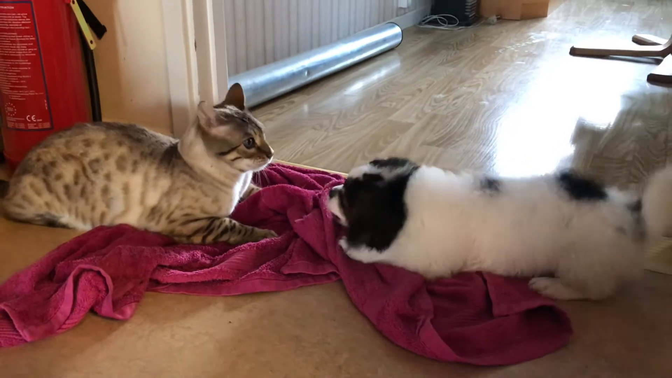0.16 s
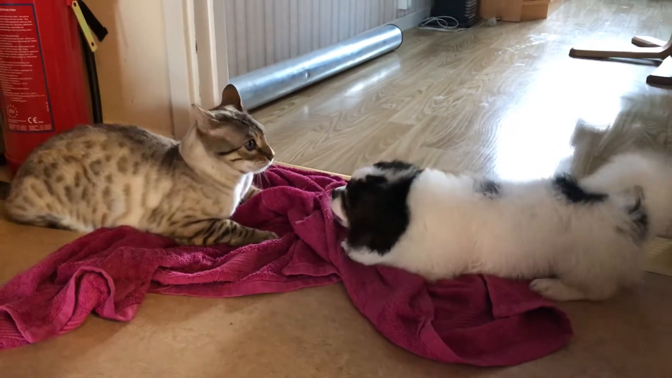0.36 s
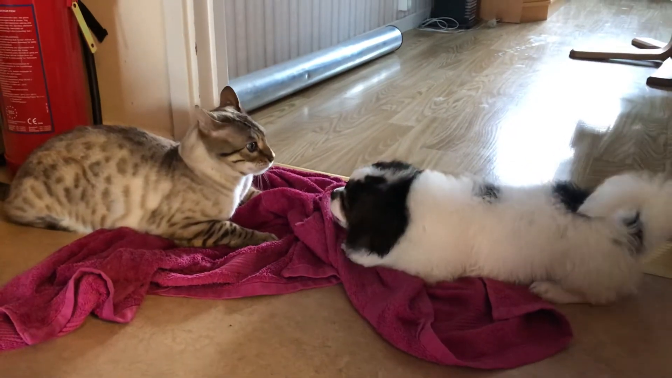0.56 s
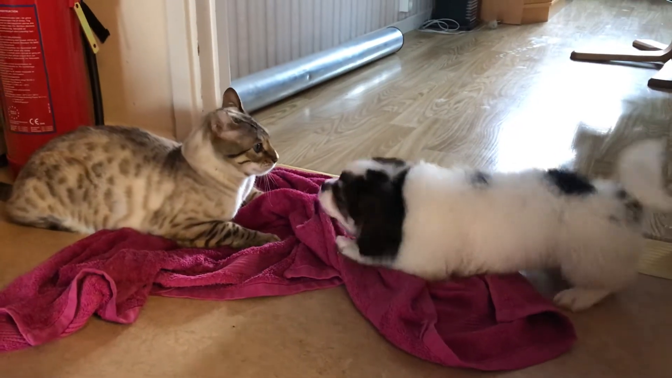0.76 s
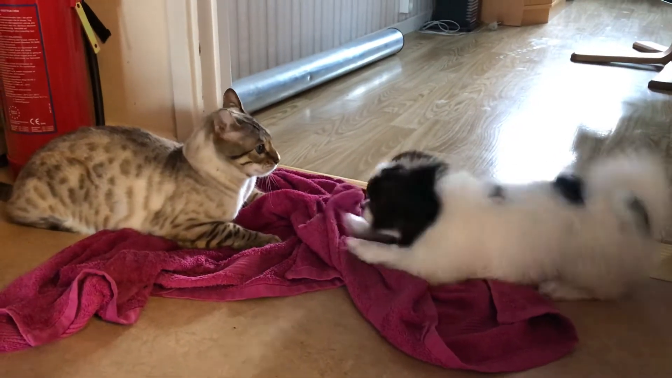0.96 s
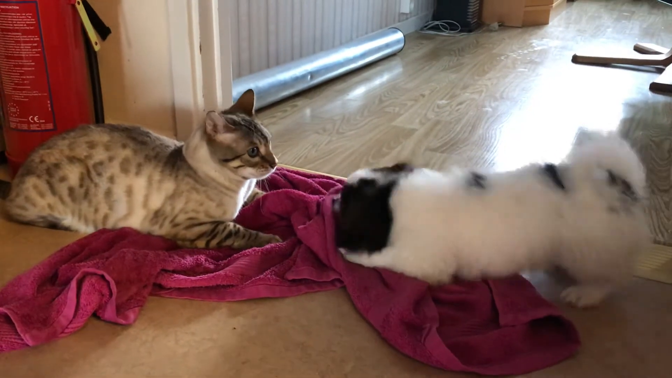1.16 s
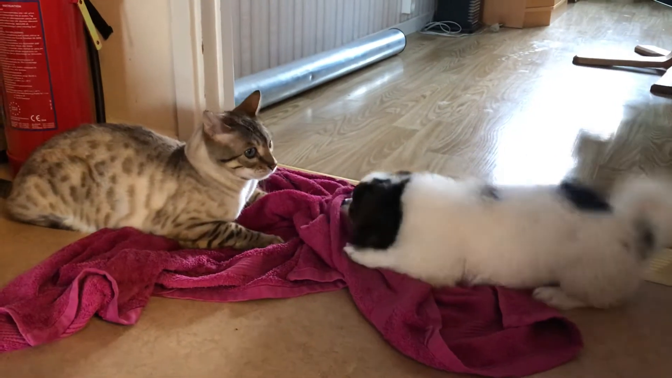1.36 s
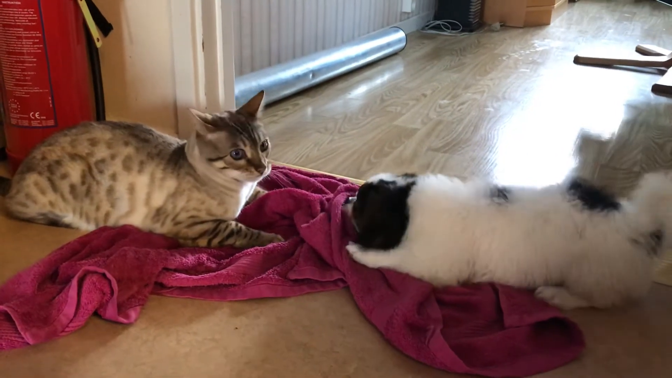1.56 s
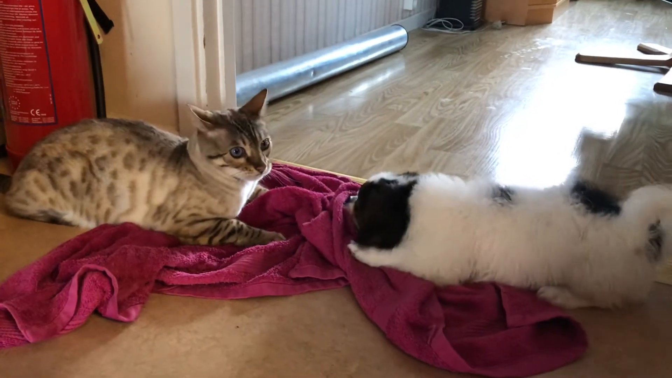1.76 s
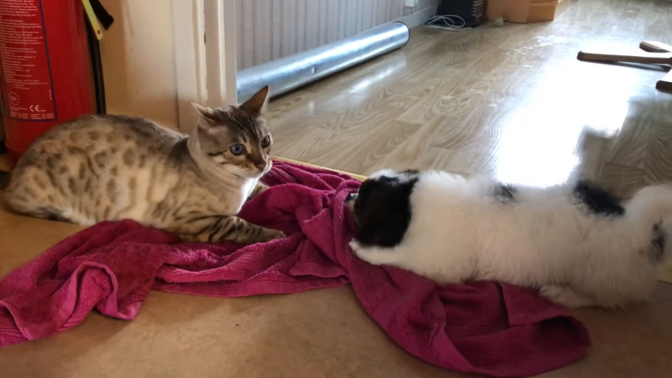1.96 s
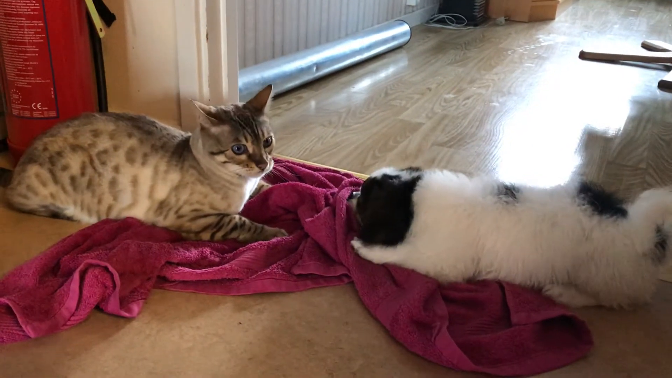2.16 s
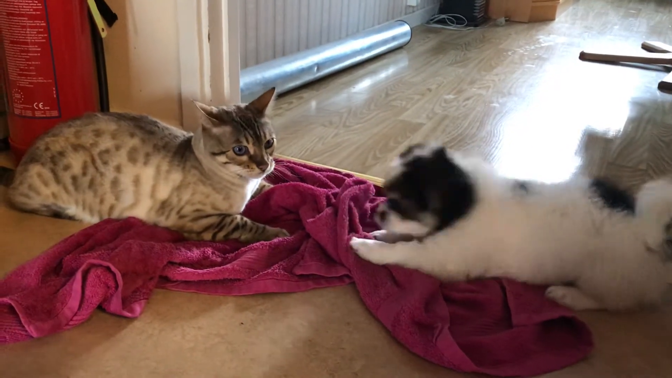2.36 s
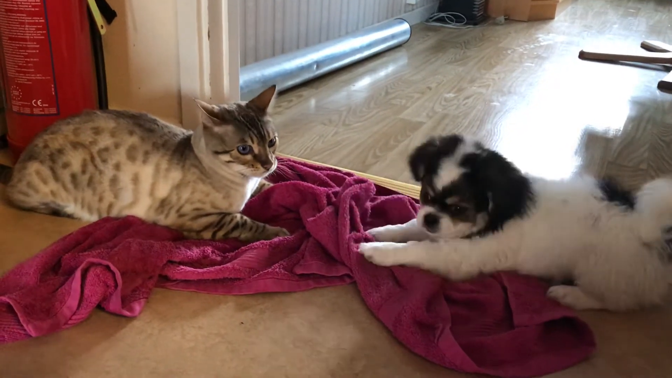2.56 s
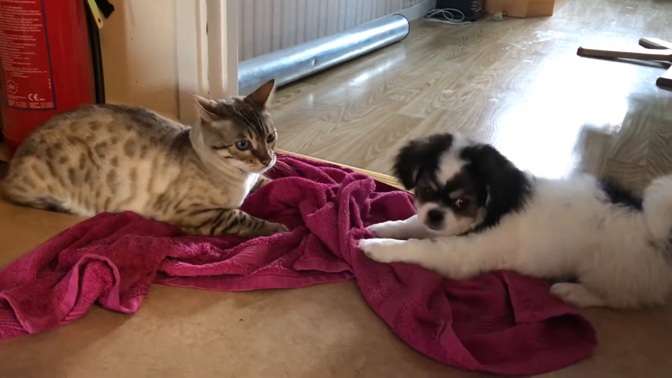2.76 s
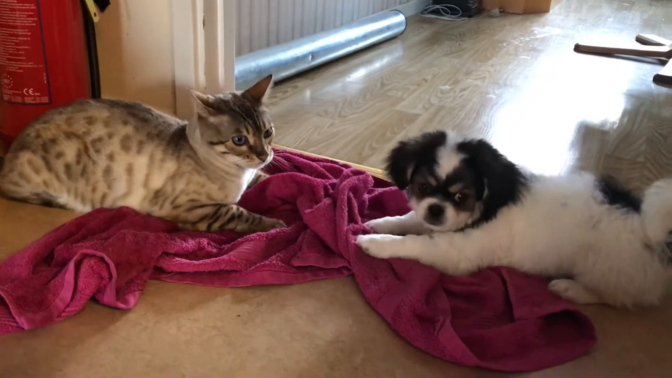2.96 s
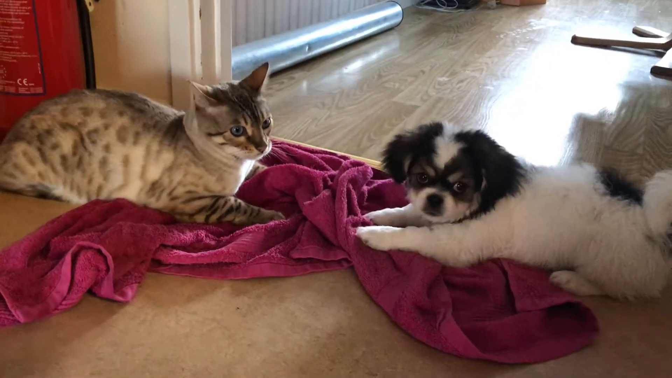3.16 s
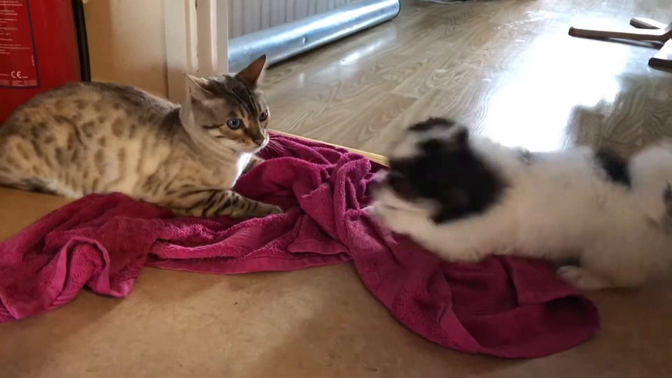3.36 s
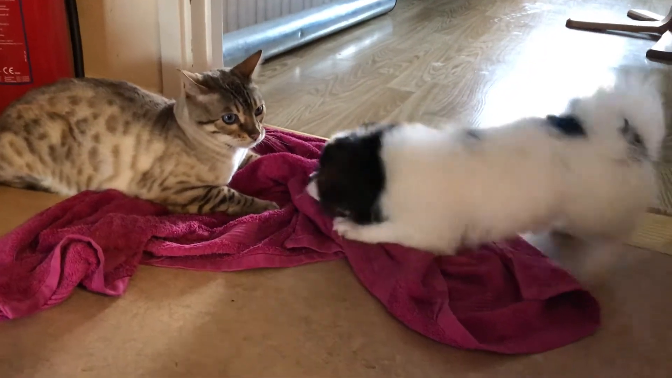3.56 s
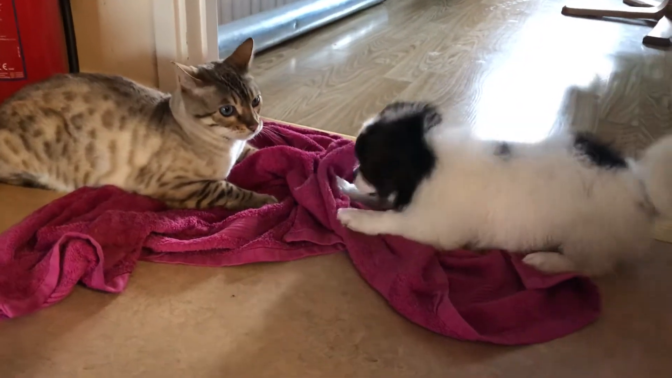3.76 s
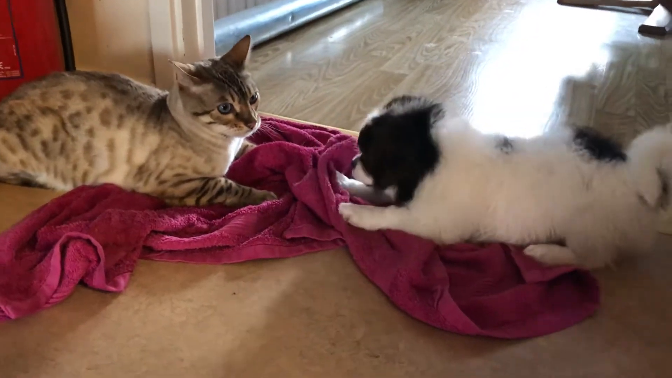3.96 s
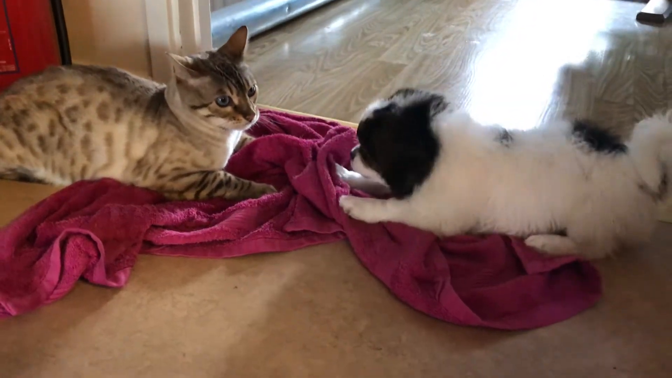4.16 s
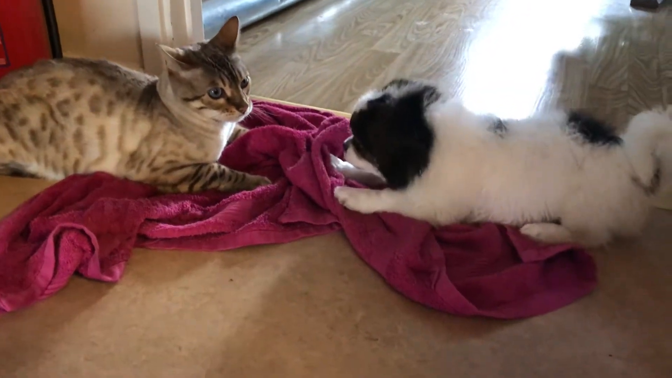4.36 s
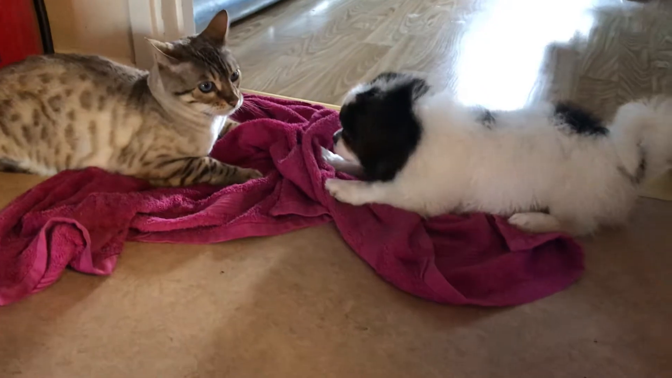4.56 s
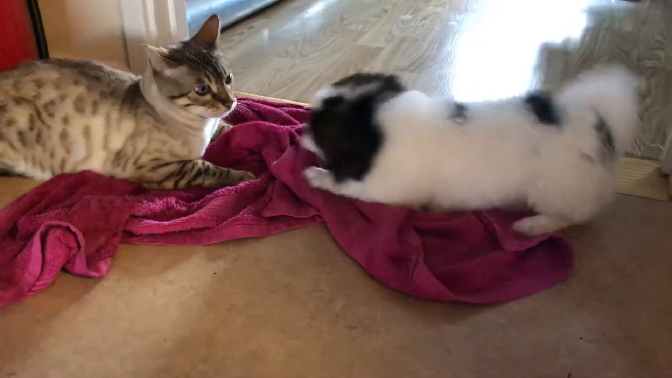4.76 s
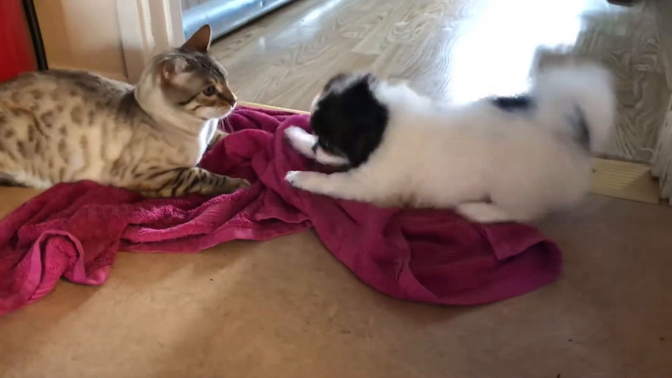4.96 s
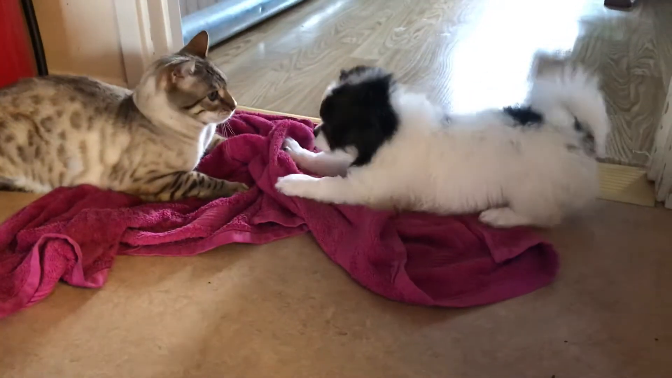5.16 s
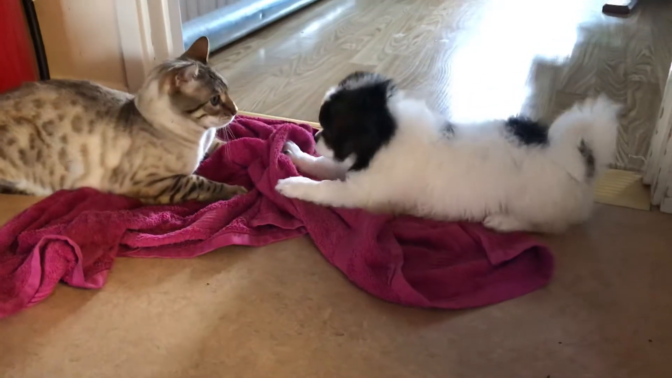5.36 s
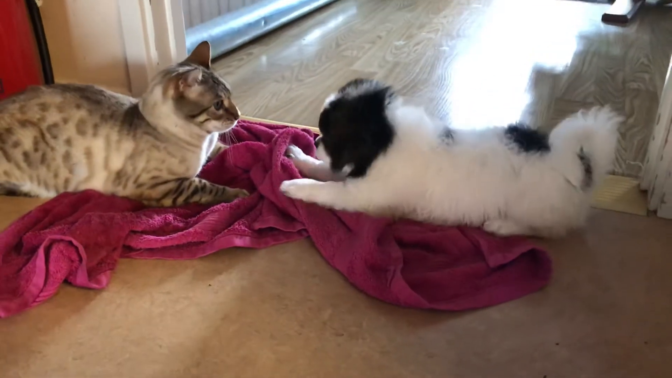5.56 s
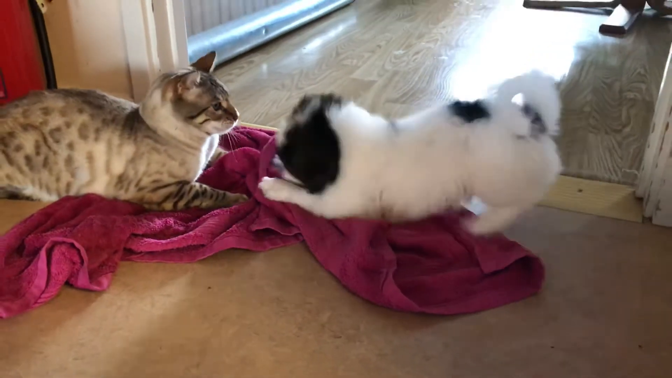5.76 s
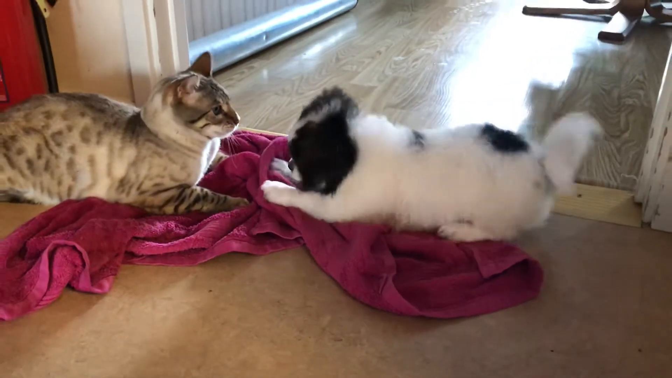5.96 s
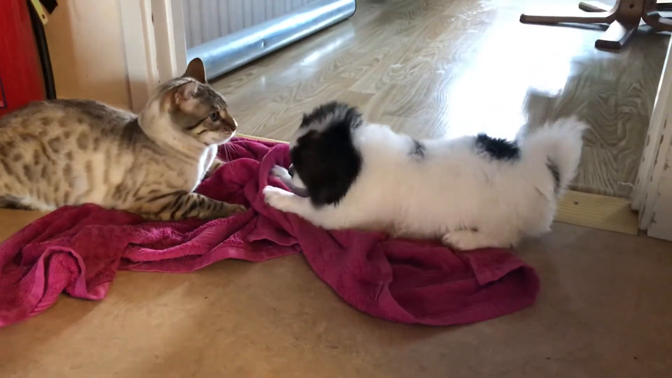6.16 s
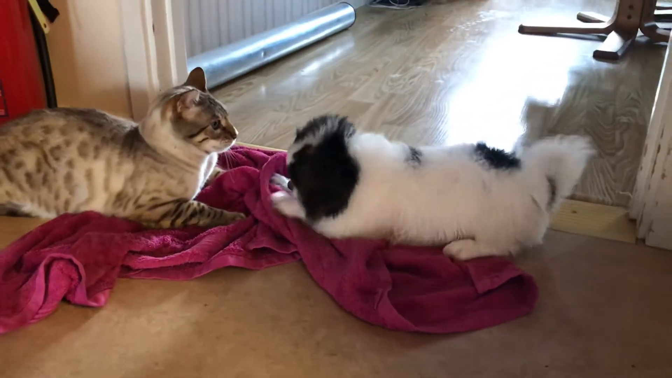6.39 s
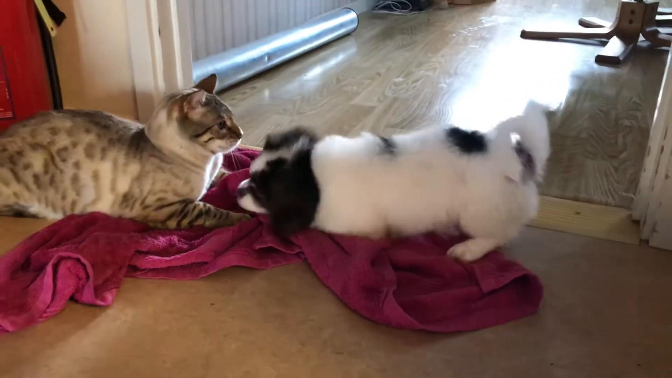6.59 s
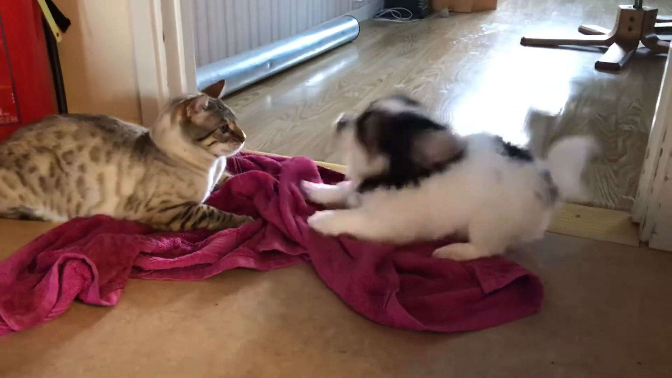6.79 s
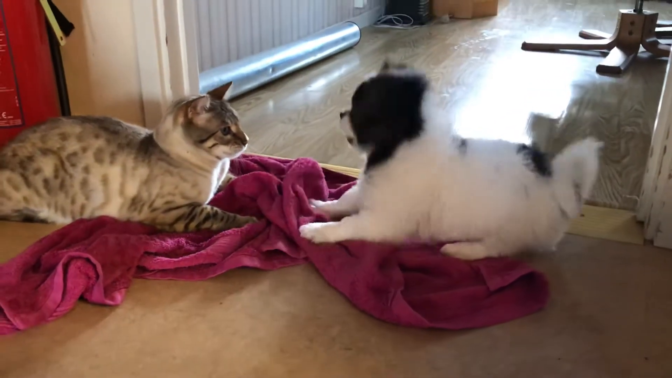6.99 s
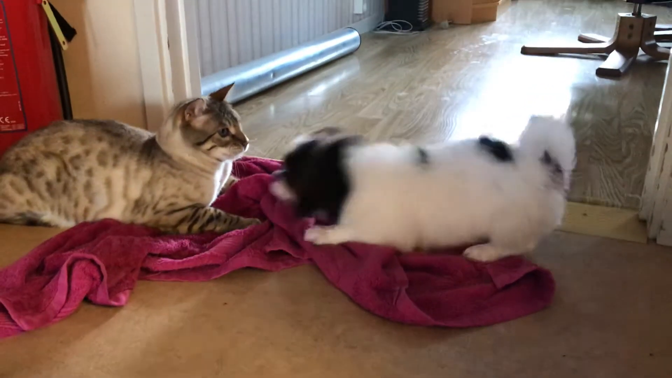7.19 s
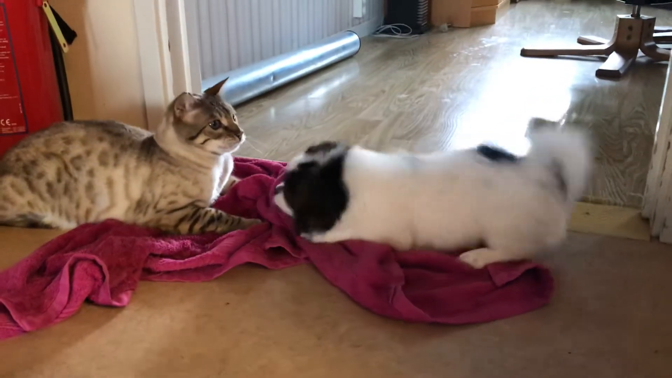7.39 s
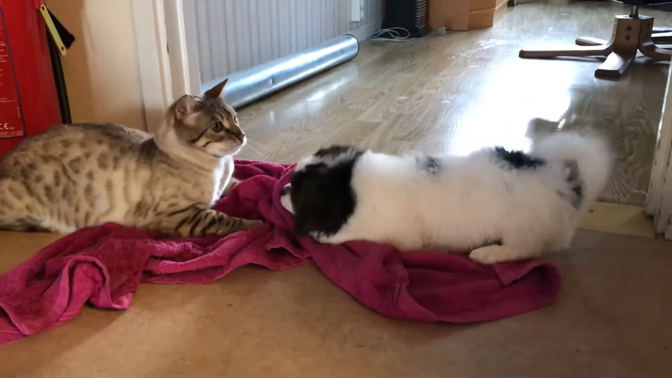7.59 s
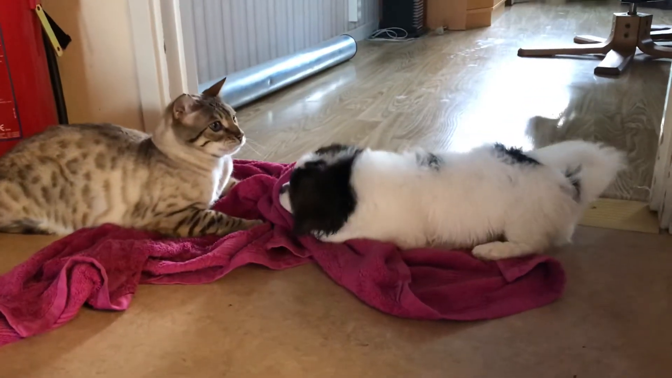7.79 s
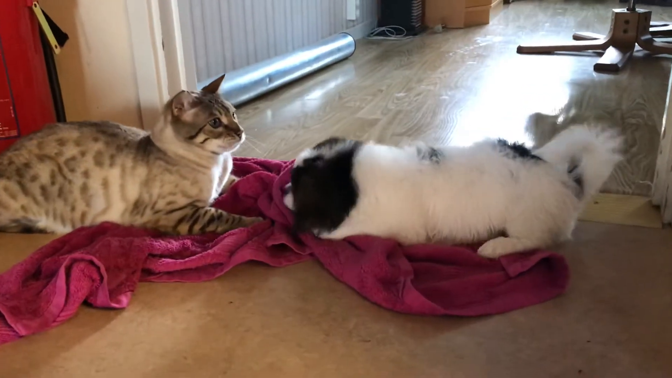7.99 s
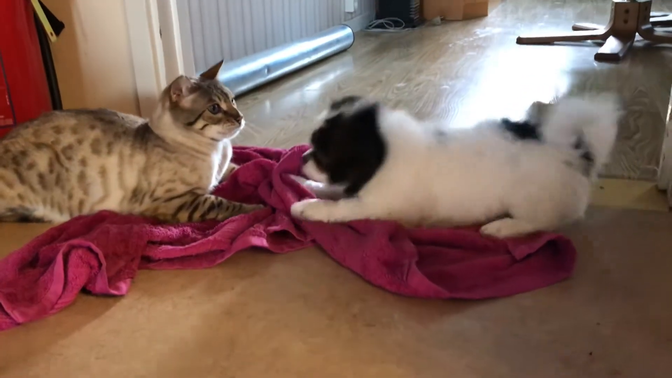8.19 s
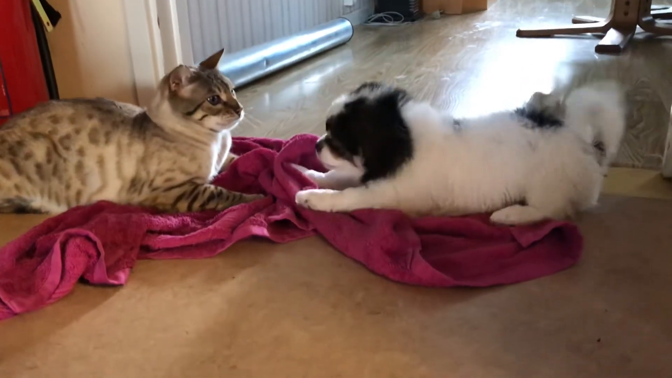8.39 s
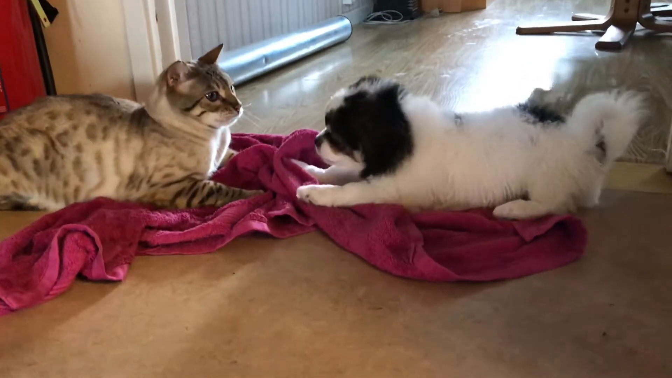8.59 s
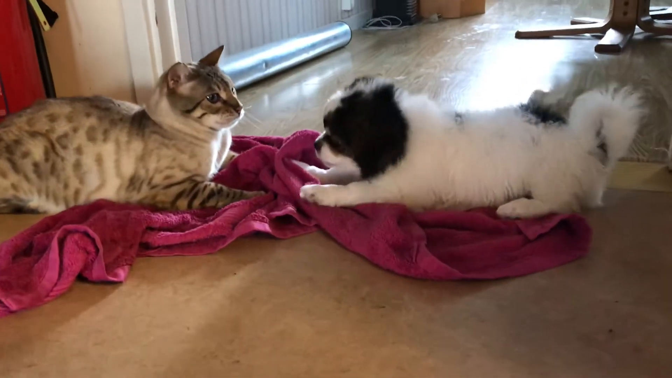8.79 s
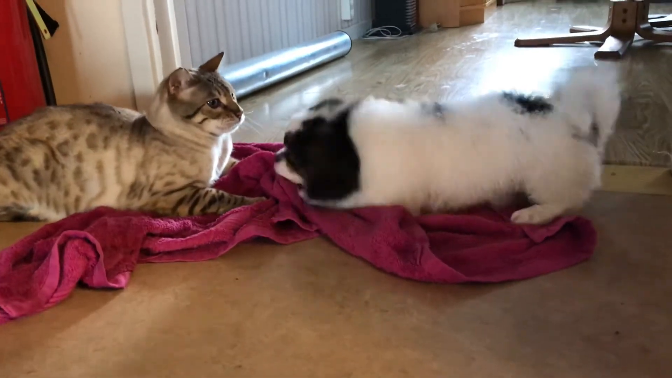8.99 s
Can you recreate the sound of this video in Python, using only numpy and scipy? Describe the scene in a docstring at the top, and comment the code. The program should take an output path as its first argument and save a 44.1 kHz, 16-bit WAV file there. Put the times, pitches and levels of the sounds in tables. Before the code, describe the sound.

A puppy yaps sharply indoors, with one low growl midway, amid clicking teeth and claws, paw thumps and a faint hum.

```python
"""A puppy yaps at a cat in a small hard-floored room, over the faint hum of an appliance.
A towel rustles under it as it starts with three yaps, grunting just before the third. A fourth follows
a pause; halfway through comes one low growl, then five more yaps. Each yap is breath shaking the vocal
folds: it starts hoarse, in most cases breaks into a clear note and a squeal, and falls back into a rasp.
All along, teeth and claws click and paws thump, and the walls echo the puppy's sounds."""
import sys
import numpy as np
from scipy import signal
from scipy.fft import rfft, irfft
from scipy.io import wavfile
from scipy.ndimage import uniform_filter1d, minimum_filter1d

SR = 44100
rng = np.random.default_rng(int(sys.argv[2]) if len(sys.argv) > 2 else 0)


def wav_out(sig):
    """Save sig, one row per channel (or a flat mono array), as 16-bit PCM at SR to the path in sys.argv[1]."""
    wavfile.write(sys.argv[1], SR, np.round(np.clip(np.atleast_2d(sig).T, -1, 1) * 32767).astype(np.int16))


N = 398663

# A "colour" says how strong a sound is from low to high. Each lists (frequency [Hz], level [dB]).
RUMBLE_COLOUR = [(15, -55.5), (25, -33), (70, -13.5), (108, -3), (145, -15.5), (175, -11), (242, -18),
                 (277, -5), (301, -13.5), (451, -20), (624, -20), (988, -21.5), (1330, -25), (1940, -30),
                 (16000, -57)]
HISS_COLOUR = [(300, -8), (1500, 8.5), (5000, 2), (7500, -0.5), (10000, -3), (15000, -4.5)]
ECHO_COLOUR = [(100, -9), (500, 4), (1000, -4), (2000, 2.5), (3200, 3.5), (6000, -2.5), (14000, -3)]
PAW_COLOUR = [(20, -43.5), (40, -17.5), (65, -4), (110, -1), (180, -4), (300, -17.5), (600, -29),
              (2000, -35.5), (6000, -76)]
CLICK_COLOUR = [(300, -20.5), (1500, 1.5), (2500, -3), (4200, -2), (6000, 1), (8000, 3), (11000, 2),
                (15000, -3)]
GROWL_COLOUR = [(60, -25.5), (130, -16.5), (230, 6), (350, 2), (560, -4), (1000, -7.5), (1700, -10.5),
                (2500, -24), (2900, -19), (3600, -31), (5500, -34.5), (15000, -46)]
BREATH_COLOUR = [(4000, -21.5), (5500, -1.5), (6600, -21), (8300, -2), (9700, -6.5), (11000, -3.5),
                 (12300, -0.5), (14000, -5), (16000, -13.5)]
# how long the room rings: (frequency [Hz], time to fade by 60 dB [s])
ECHO_TIMES = [(150, 0.46), (500, 0.35), (1000, 0.4959), (2000, 0.64), (3500, .5), (8000, 0.5),
              (15000, 0.84)]
# the appliance's tones: (frequency [Hz], level [dB])
HUM_TONES = [(102.3, -76.5), (274.5, -68.5), (372, -75.5), (613.7, -80.5), (635.2, -75.5)]
# the towel shifting: (start [s], length [s], level [dB])
RUSTLES = [(-.3, 0.47, -45), (.6, 1.15, -60.5), (3.5, 0.84, -66), (4.1, 0.73, -63.5), (5.55, 0.43, -68.5),
           (6.3, 0.82, -78.5), (7.25, 1.26, -64), (8.85, 0.31, -62)]
# towel rubs and soft snuffles: (start [s], length [s], level [dB], centre [Hz], width [octaves])
RUBS = [(0.144, 0.078, -59.5, 8900, 1.3), (1.933, 0.021, -53, 1000, 0.39), (2.343, 0.2, -66.5, 1200, 1.54),
        (2.353, 0.17, -74, 5500, 0.36), (3.393, 0.028, -65, 3800, 0.32), (3.454, 0.041, -53, 3970, 0.52),
        (3.45, 0.052, -58, 1590, 0.37), (4.121, 0.055, -64, 1230, 0.78), (4.778, 0.11, -61.5, 2480, 1.77),
        (5.076, 0.11, -63, 5160, 0.19), (6.338, 0.048, -75, 4970, 0.87), (7.042, 0.015, -61.5, 2010, 0.57),
        (7.125, 0.034, -64, 2400, 0.24), (7.204, .04, -59.5, 7880, .8)]
# paws landing: (time [s], peak level [dB])
PAW_THUMPS = [(0.131, -40), (0.186, -53.5), (1.395, -39.5), (3.513, -37.5), (3.724, -39.5), (4.287, -46.5),
              (5.023, -32), (5.9, -34), (6.518, -52), (6.769, -38), (6.799, -43), (7.187, -42.5),
              (7.443, -42), (8.078, -54)]
# teeth and claws: (time [s], level [dB])
CLICKS = [(0.135, -29), (0.7925, -30.5), (0.989, -39.5), (1.3933, -23), (2.9327, -52.5), (3.3764, -45),
          (3.521, -15.5), (3.734, -30.5), (4.6716, -49), (4.945, -42), (5.022, -22), (5.904, -24.5),
          (6.7726, -27), (7.0191, -42.5), (7.438, -37.5), (8.0705, -38), (8.9034, -52)]
# the growl's pushes: (start [s], length [s], level [dB], first flap rate [Hz], mouth resonance [Hz])
GROWL_PUSHES = [(4.897, 0.083, -30, 173, 785), (4.971, 0.088, -31.5, 197, 730),
                (5.063, 0.039, -32, 120, 984), (5.085, .085, -31, 138, 1178), (5.161, 0.1, -43.5, 88, 776),
                (5.221, 0.1, -44.5, 75, 740), (5.313, 0.071, -47.5, 55, 732)]
# the yaps: (start [s], rise [s], hold [s], fall [s], level [dB], starting effort [dB],
# top hoarse pitch [Hz], roughness [0-1], brightness [dB], lag of the treble [s])
YAPS = [(-0.02, 0.021, 0.064, 0.051, -16, -7.5, 478.5, 0.83, -7.5, 0.024),
        (0.733, 0.025, 0.066, 0.072, -13.5, -10, 527, .3, -5, 0.02),
        (1.238, 0.017, .086, 0.066, -16.5, -11.5, 470.3, .6, -4.5, 0.014),
        (3.536, 0.029, 0.064, .05, -11, -10.5, 476.5, 0.4, -6, 0.007),
        (5.644, 0.044, 0.059, 0.094, -13, -28, 605, 0.6, -10, 0.011),
        (6.512, 0.039, 0.041, 0.054, -17, -21.5, 446.4, 0.52, -11, 0.0023),
        (7.223, .043, .055, .05, -12, -23.5, 585.2, .35, -9.5, 0.0012),
        (8.08, .04, .04, .052, -14.5, -21.5, 465.6, 0.56, -10.5, .004),
        (8.941, .031, 0.061, 0.057, -11.5, -14.5, 593, 0.46, -6, 0.0087)]
# mouth shape for each yap; a resonance is a frequency at which the air inside rings:
# (resonances 1 to 4 [Hz], levels of resonances 2 to 4 [dB], top band [dB], nose [dB], breath [dB])
MOUTHS = [(983, 1700, 2380, 3450, -5, 1, -7, -12, -12, -23),
          (1040, 1650, 2300, 3150, 4.5, -18, -6, -16.5, -13, -23),
          (928, 1427, 2350, 2300, 6.5, -5, -9, -47.5, -11, -42),
          (947, 1600, 2150, 2900, 8, 11.5, 4.5, -8.5, -16, -29.5),
          (1059, 2460, 1800, 3170, -3.5, 3, 3, -15.5, -13, -18.5),
          (883, 1600, 2470, 3600, -29, 9.5, 1, -9.5, -6, -22),
          (1035, 1040, 2270, 4050, -4, 0, -14.5, -16, -13, -22.5),
          (913, 1540, 2640, 3850, -3, 7.5, -4, -18, -10, -22.5),
          (1047, 1810, 2640, 3070, 19, 20, 10.5, -31, -14.5, -19.5)]
# where the voice breaks: (start [s], note length [s], note pitch [Hz], note boost [dB],
# squeal length [s], squeal pitch [Hz], squeal boost [dB], squeal roughness [0-1], extra brightness [dB])
VOICE_BREAKS = [(0.765, 0.047, 761.6, -4.5, 0.027, 1023, 9, 0.39, 2.5),
                (1.262, .034, 760.8, -4, .024, 893.7, 5.5, 0.3, 1),
                (3.568, 0.032, 798.4, -1, 0.04, 957.5, 0, 0.64, -1),
                (5.72, .026, 775.5, -5.5, .042, 818, 0.5, 0.31, 4.5),
                (7.281, .021, 804.6, -6.5, .031, 1020, 4.5, 0.43, 0.5),
                (8.983, 0.031, 793, -1, .045, 859, 0.5, 0.24, -0.5)]
# whistling gaps between the teeth: (frequency [Hz], width [Hz], level [dB])
TOOTH_GAPS = [(8500, 300, -5), (10950, 400, -6), (13600, 500, -5.5)]

START_HZ, END_HZ, END_ROUGHNESS = 279.7, 270.7, 0.59  # a yap's voice at its two weak ends
EFFORT_FADE_DB, NOSE_FADE_DB = -23.5, -6  # drops as a yap ends
TREBLE_START_DB, TREBLE_FADE_DB = -5, -14.5  # extra dullness as a yap starts and ends
BREAK_S, NOTE_ROUGHNESS, NOTE_RISE_HZ_PER_S, SQUEAL_SAG_HZ_PER_S = .008, .07, 1500, 1600


def gain_of(db):
    """Turns decibels into a number to multiply by."""
    return 10 ** (np.asarray(db) / 20)


def evened(x):
    """Scales a sound to an average strength (rms) of 1."""
    return x / np.sqrt(np.mean(x ** 2) + 1e-20)


def steadied(x, size=400):
    """Keeps a sound's strength near 1 from moment to moment."""
    power = uniform_filter1d(uniform_filter1d(x ** 2, size), size)
    return x / np.sqrt(abs(power) + 1e-20)


def look_up(points, hz):
    """Reads between the rows of a table by frequency, on a log scale."""
    f, value = np.transpose(points)
    return np.interp(np.log(hz + 1), np.log(f + 1), value)


def ramp(t, start, length):
    """Rises from 0 to 1 over length seconds."""
    return np.clip((t - start) / length, 0, 1)


def add(mix, start, sound):
    """Adds a sound to the mix at a time in seconds."""
    at = round(start * SR)
    sound = sound[max(0, -at):]
    part = mix[max(0, at):][:len(sound)]
    part += sound[:len(part)]


def white(count):
    """Up to a second of plain noise."""
    return rng.standard_normal(SR)[:count]


def coloured(x, colour):
    """Gives a sound a colour, at strength 1."""
    hz = np.fft.rfftfreq(len(x), 1 / SR)
    return evened(irfft(rfft(x) * gain_of(look_up(colour, hz)), len(x)))


def waver(noise, hz):
    """Smooths noise into a wobble, mostly slower than hz."""
    return evened(signal.sosfilt(signal.butter(2, hz, fs=SR, output="sos"), noise))


def band(x, low_hz, high_hz, order=3):
    """Keeps what lies between two frequencies."""
    return signal.sosfilt(signal.butter(order, [low_hz, high_hz], "band", fs=SR, output="sos"), x)


def resonate(x, hz, width_hz):
    """Makes a sound ring around one frequency, which may slide."""
    turn = np.exp(2j * np.pi * np.cumsum(hz * np.ones(len(x))) / SR)
    keep = np.exp(-np.pi * width_hz / SR)
    return 2 * (turn * signal.lfilter([1 - keep], [1, -keep], x / turn + 1e-18)).real


def background():
    """The room rumbles, an appliance hums, and a faint hiss swells as the towel shifts."""
    t = np.arange(N) / SR
    rumble = gain_of(-59.53) * coloured(rng.standard_normal(N), RUMBLE_COLOUR)
    hum = np.zeros(N)
    for hz, db in HUM_TONES:
        drift = 0.36 * waver(rng.standard_normal(N), hz=4.4)
        hum += gain_of(db) * evened(np.sin(2 * np.pi * hz * t + drift))
    swells = sum(gain_of(db) * np.sin(np.pi * ramp(t, start, length)) ** 2
                 for start, length, db in RUSTLES)
    hiss = (gain_of(-74.5) + swells) * coloured(rng.standard_normal(N), HISS_COLOUR)
    return rumble + hum + hiss


def room_echo(x, spacing=22):
    """Sound bounces off the walls at random moments; each frequency dies away at its own speed."""
    count = SR // spacing
    bounces = np.zeros(SR)
    bounces[np.arange(count) * spacing + rng.integers(0, spacing, count)] = rng.choice([-1., 1.], count)
    hz, t, spectrum = signal.stft(bounces, SR, nperseg=256)
    fade = gain_of(-60 * t / look_up(ECHO_TIMES, hz)[:, None])
    tail = signal.istft(spectrum * fade, SR, nperseg=256)[1]
    age = np.arange(len(tail)) / SR
    early_boost = 1 + 3.44 * np.exp(-age / 0.019)  # near walls and the floor answer first and loudest
    tail = coloured(tail, ECHO_COLOUR) * early_boost * ramp(age, 0, 0.0008) ** 2
    tail = tail[:3 * SR // 4]
    return signal.fftconvolve(x, tail / np.linalg.norm(tail))[:N]


def rub(length, centre_hz, octaves):
    """A rub on the towel or a snuffle: one grainy swell of noise."""
    count = round(length * SR)
    hz = np.fft.rfftfreq(count, 1 / SR) + 1
    grains = white(count) * gain_of(2.6 * waver(white(count), hz=197.3))
    noise = irfft(rfft(grains) / (1 + (np.log2(hz / centre_hz) / octaves) ** 4), count)
    return evened(noise * np.sin(np.pi * np.linspace(0, 1, count) ** 0.68))


def knock(colour, rise_s, decay_s, size=16384):
    """A blow that does not ring, such as a paw landing: a burst of noise with peak 1."""
    t = np.arange(size) / SR
    burst = coloured(white(size), colour) * (1 - np.exp(-t / rise_s)) * np.exp(-t / decay_s)
    return burst / abs(burst).max()


def click():
    """A tooth or claw strikes: a dry tick, then a short scrape."""
    tick = knock(CLICK_COLOUR, rise_s=.0003, decay_s=.0016)
    scrape = knock(CLICK_COLOUR, rise_s=0.0018, decay_s=.03)
    return tick + gain_of(-19.5) * scrape


def grunt(length=.1, first_hz=220, sag_hz_per_s=520):
    """A nearly pure falling hum, made with the mouth shut."""
    t = np.arange(0, length, 1 / SR)
    hz = (first_hz - sag_hz_per_s * t) * (1 + 0.027 * waver(white(len(t)), hz=90))
    phase = 2 * np.pi * np.cumsum(hz) / SR
    swell = np.sin(np.pi * t / length) ** 0.98
    return swell * evened(np.sin(phase) + gain_of(-32) * np.sin(2 * phase))


def growl(length, level_db, first_hz, mouth_hz, slowing=.35, fade_db=-9):
    """One push of growl: the vocal folds flap slowly, puffing through the nose and barely open mouth."""
    t = np.arange(0, length, 1 / SR)
    rate = first_hz * (1 - slowing * t / length)
    cycles = np.cumsum(rate * (1 + 0.24 * waver(white(len(t)), hz=75.9))) / SR
    slaps = evened(np.diff(np.floor(cycles), prepend=0) * gain_of(2 * white(len(t))))
    since_slap = (cycles % 1) / rate
    puffs = evened((.2 + np.exp(-since_slap / .003)) * white(len(t)))
    flaps = .9 * slaps + puffs
    mouth = resonate(resonate(flaps, mouth_hz, width_hz=280), mouth_hz, width_hz=280)
    voice = coloured(flaps, GROWL_COLOUR) + gain_of(-3) * evened(mouth)
    push = ramp(t, 0, 0.0088) * ramp(length - t, 0, 0.012)
    return gain_of(level_db + fade_db * t / length) * push * steadied(voice, size=1100)


def breath(buzz, puffs, jaw_shut):
    """Air hisses and whistles past the teeth; the whistles sink as the jaw shuts."""
    spurts = gain_of(2 * waver(white(len(buzz)), hz=50))  # spit makes the flow uneven
    rasp = (puffs + .6 * buzz) * spurts
    whistles = np.zeros(len(rasp))
    for hz, width_hz, db in TOOTH_GAPS:
        wander = .035 * waver(white(len(rasp)), hz=25)  # tongue and lips move each gap
        whistles += gain_of(db) * evened(resonate(rasp, hz * (1 - 0.19 * jaw_shut + wander), width_hz))
    return evened(coloured(rasp, BREATH_COLOUR) + whistles)


def vocal_folds(hz, rough):
    """Flaps in the throat buzz and let puffs of air through; roughness makes them uneven."""
    pitch_wobble = (.006 + .085 * rough) * waver(white(len(hz)), hz=260)
    cycles = np.cumsum(hz * (1 + pitch_wobble)) / SR
    buzz = evened(sum(np.cos(2 * np.pi * k * cycles) * (k * hz < SR / 2) / k ** 0.23
                      for k in range(1, 24)))
    flutter = 1 + .6 * rough * waver(white(len(hz)), hz=220)
    puffs = evened((.5 + np.exp(-(cycles % 1) / 0.38)) * white(len(hz)))
    return buzz * flutter, puffs * (1 + flutter) / 2


def voice_break(t, hz, rough):
    """At the listed times the hoarse voice jumps to a rising note, then strains into a sagging squeal."""
    boost_db = shine_db = high_share = np.zeros(len(t))
    for (start, note_s, note_hz, note_db,
         squeal_s, squeal_hz, squeal_db, squeal_rough, bright_db) in VOICE_BREAKS:
        edges = start, start + note_s, start + note_s + squeal_s
        broken, strained, over = (ramp(t, at - BREAK_S / 2, BREAK_S) for at in edges)
        note, squeal = broken - strained, strained - over  # each is 1 while it sounds
        rising_hz = note_hz + NOTE_RISE_HZ_PER_S * (t - start)
        sagging_hz = squeal_hz - SQUEAL_SAG_HZ_PER_S * (t - start - note_s)
        hz = hz + note * (rising_hz - hz) + squeal * (sagging_hz - hz)
        rough = rough + note * (NOTE_ROUGHNESS - rough) + squeal * (squeal_rough - rough)
        boost_db = boost_db + note * note_db + squeal * squeal_db
        shine_db = shine_db + (note + squeal) * bright_db
        high_share = high_share + note + squeal
    return hz, np.clip(rough, 0, 1), boost_db, shine_db, high_share


def yap(row, mouth):
    """One push of breath shakes the vocal folds, and the throat, nose and mouth ring with them."""
    start, rise, hold, fall, level_db, onset_db, top_hz, top_rough, bright_db, treble_lag = row
    first_hz, second_hz, third_hz, fourth_hz = mouth[:4]
    second_db, third_db, fourth_db, top_db, nose_db, breath_db = mouth[4:]
    t = np.arange(0, rise + hold + fall, 1 / SR)
    # effort and jaw move together: pitch, level and roughness follow them
    opening = 1 - ramp(t, 0, rise)  # goes from 1 to 0
    closing = ramp(t, rise + hold, fall)  # goes from 0 to 1
    jaw_shut = opening + closing
    effort_db = onset_db * opening ** 0.82 + EFFORT_FADE_DB * closing ** .8
    hoarse_hz = top_hz + (START_HZ - top_hz) * opening + (END_HZ - top_hz) * closing
    hoarseness = top_rough + (END_ROUGHNESS - top_rough) * jaw_shut ** 2
    hz, rough, boost_db, shine_db, high_share = voice_break(start + t, hoarse_hz, hoarseness)
    shut = jaw_shut * (1 - high_share)  # the note and squeal count as open-mouthed
    buzz, puffs = vocal_folds(hz, rough)
    source = (1 - rough) * buzz + rough * puffs
    throat_hz = first_hz * (1.04 - 0.05 * opening - .14 * closing)
    throat = resonate(resonate(source, throat_hz, width_hz=340), throat_hz, width_hz=280)
    throat = gain_of(effort_db + boost_db) * steadied(band(throat, 190.2, 1492))
    # with the jaw nearly shut, sound leaves through the nose as a low woof
    nose = evened(band(resonate(source, hz=344.8, width_hz=210), 190, 560))
    nose *= gain_of(nose_db - 7.5 + 2.5 * shut + .5 * onset_db * opening + NOSE_FADE_DB * closing)
    # the high part of the buzz blurs into noise sooner than the low part
    blur = .8 * rough ** .65
    blurred = (1 - blur) * buzz + blur * puffs
    tuning = 1.01 - .04 * shut
    ringing = (gain_of(second_db) * resonate(blurred, second_hz * tuning, width_hz=364)
               - gain_of(third_db) * resonate(blurred, third_hz * tuning, width_hz=263)
               + gain_of(fourth_db - 7 * shut) * resonate(blurred, fourth_hz * tuning, width_hz=350))
    top_band = gain_of(top_db - 19 * shut) * band(blurred, 3500, 4800, order=2)
    treble = steadied(band(ringing + top_band, 1220, 4440, order=5))
    treble += gain_of(breath_db) * breath(buzz, puffs, jaw_shut)
    # the treble arrives late and leaves early
    dull = 1 - ramp(t, 0, rise + treble_lag)
    dull_db = (onset_db + TREBLE_START_DB) * dull ** 1.1 + TREBLE_FADE_DB * closing ** 0.39
    treble *= gain_of(bright_db + shine_db + dull_db - 3)
    return start, gain_of(level_db) * (throat + nose + treble) * signal.windows.tukey(len(t), .06)


def scene():
    """Mixes the puppy's voice and movements with their echo and the background."""
    voice, moves = np.zeros(N), np.zeros(N)
    for row, mouth in zip(YAPS, MOUTHS):
        add(voice, *yap(row, mouth))
    for start, *push in GROWL_PUSHES:
        add(voice, start, growl(*push))
    add(voice, start=1.172, sound=gain_of(-41) * grunt())
    for start, db in CLICKS:
        add(moves, start, gain_of(db) * click())
    for start, db in PAW_THUMPS:
        add(moves, start, gain_of(db) * knock(PAW_COLOUR, rise_s=0.0028, decay_s=0.039))
    for start, length, db, centre_hz, octaves in RUBS:
        add(moves, start, gain_of(db) * rub(length, centre_hz, octaves))
    muffled = band(moves, 60.3, 6185, order=1)  # the towel soaks up treble before it reaches the walls
    echo = room_echo(gain_of(-6) * voice + gain_of(-5) * muffled)
    return (voice + moves + echo + background())[None]


def record(dry, cutoff_hz=15900):
    """Briefly turns down any peak that is too loud, then cuts the very highest treble."""
    needed_gain = 1 / np.maximum(abs(dry), 1)
    limited = dry * uniform_filter1d(minimum_filter1d(needed_gain, size=200), size=200)
    treble_cut = signal.firwin(511, cutoff_hz, window=("kaiser", 9), fs=SR)
    return signal.oaconvolve(limited, treble_cut[None], "same")


dry = scene()
out = record(dry)
wav_out(out)
```